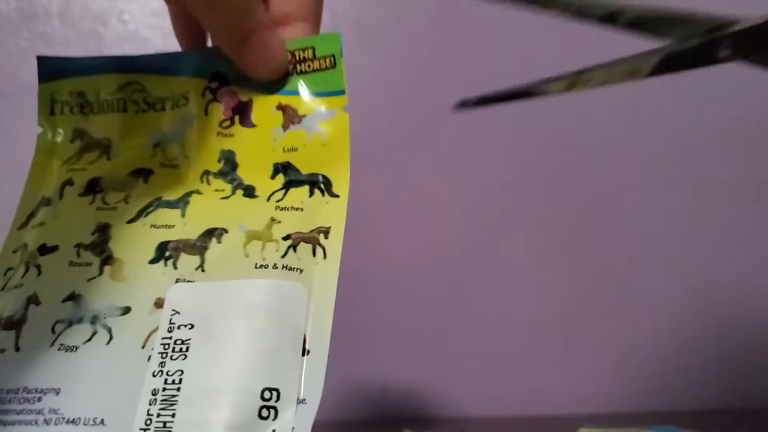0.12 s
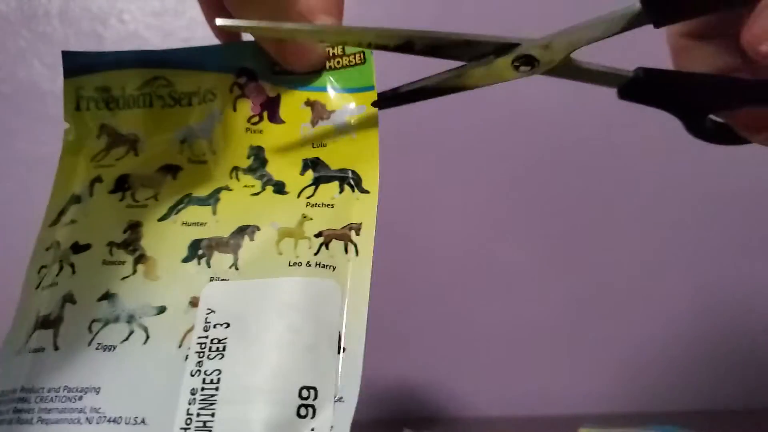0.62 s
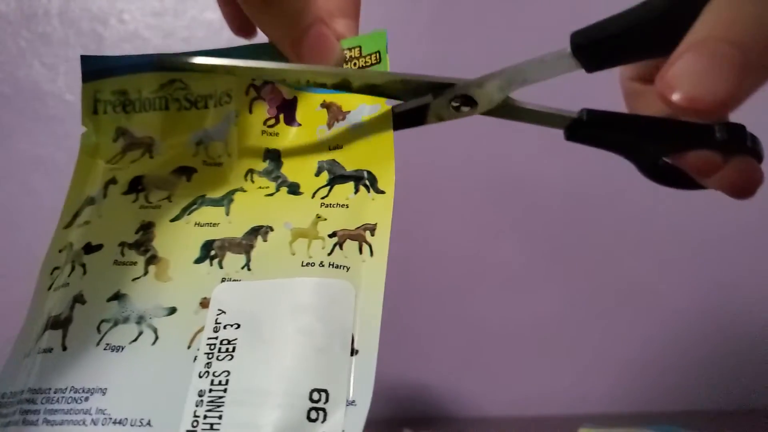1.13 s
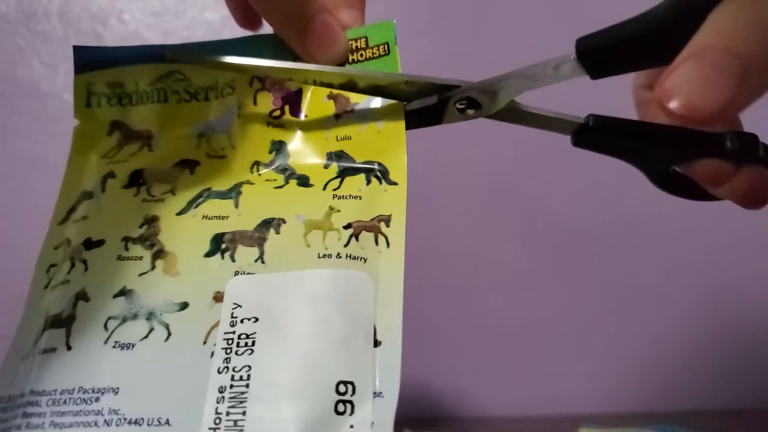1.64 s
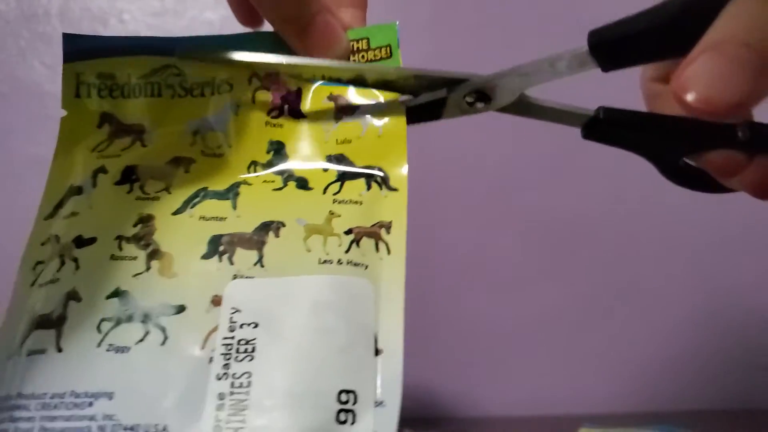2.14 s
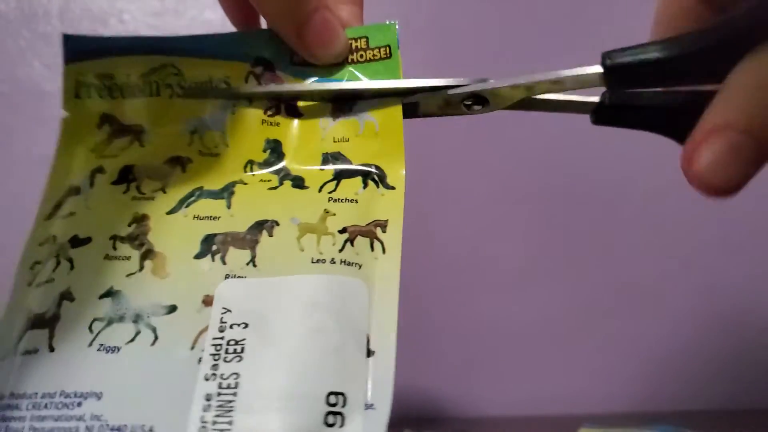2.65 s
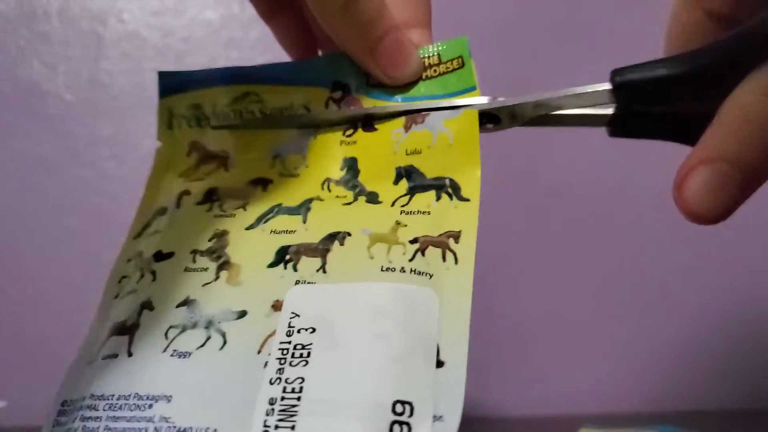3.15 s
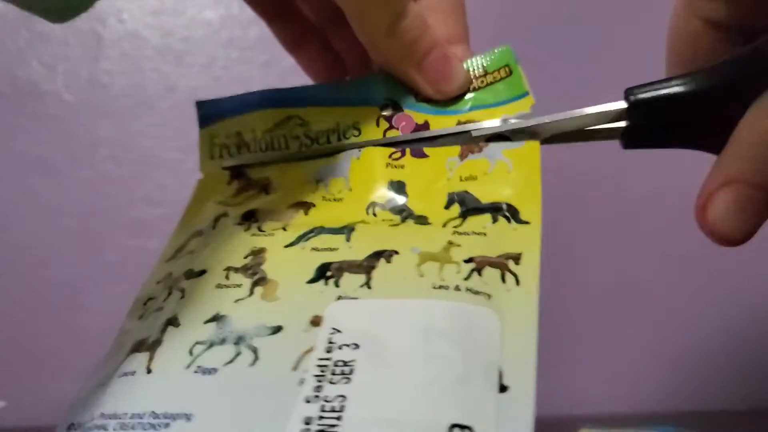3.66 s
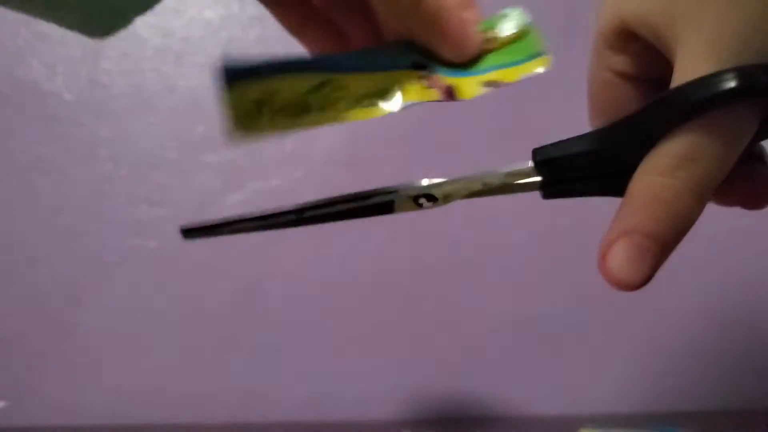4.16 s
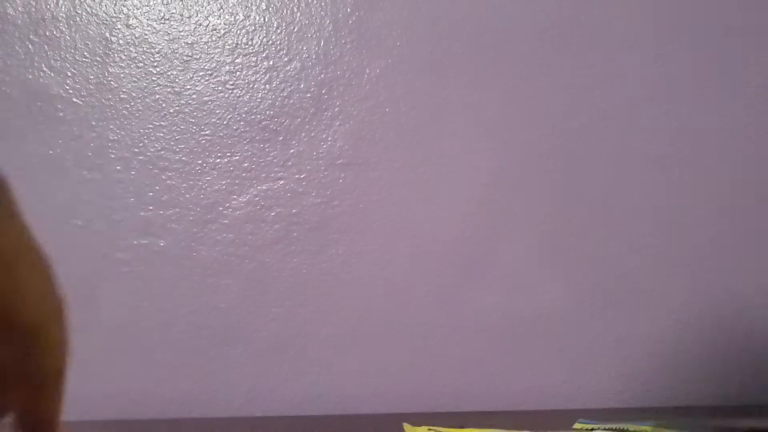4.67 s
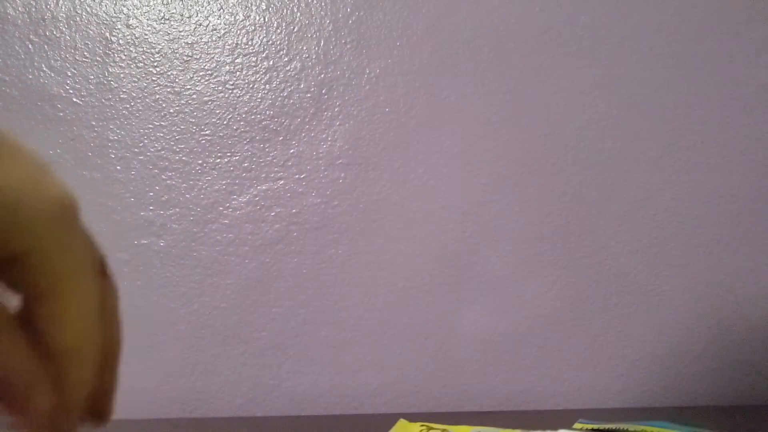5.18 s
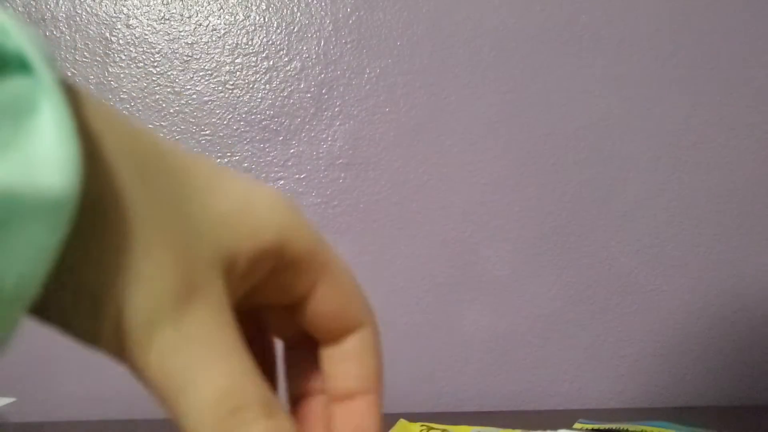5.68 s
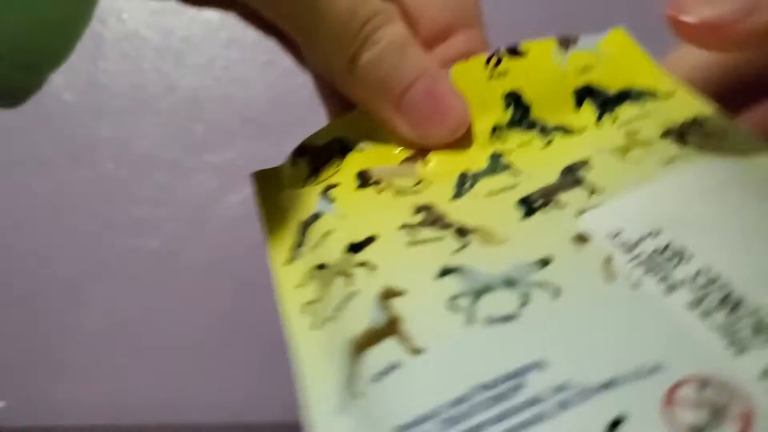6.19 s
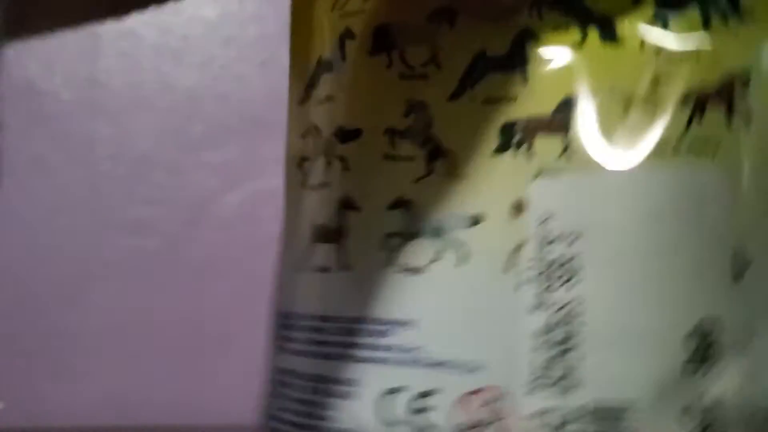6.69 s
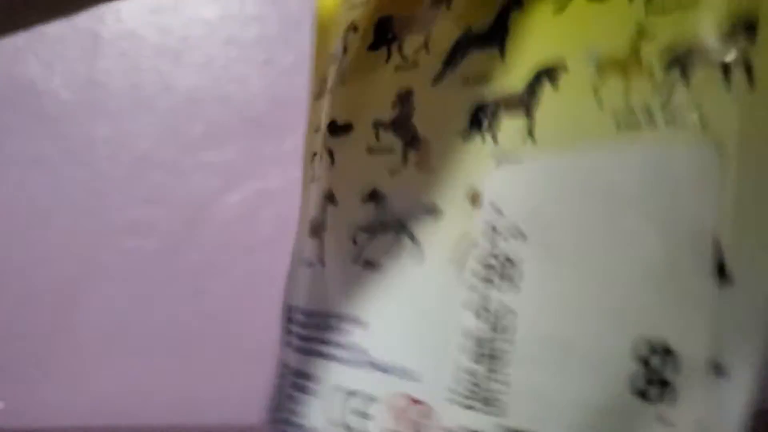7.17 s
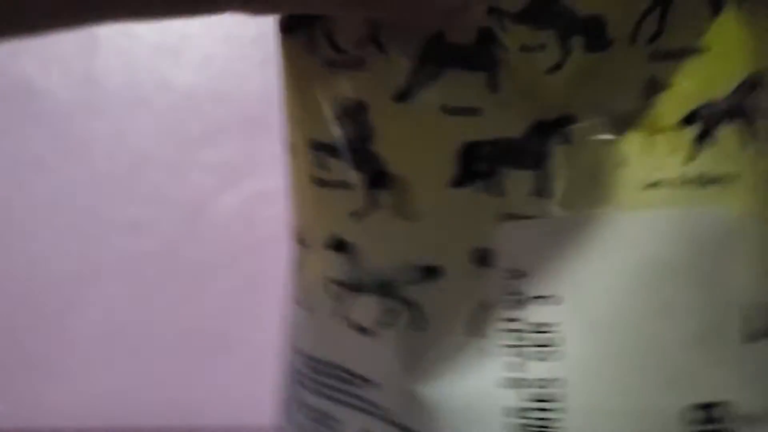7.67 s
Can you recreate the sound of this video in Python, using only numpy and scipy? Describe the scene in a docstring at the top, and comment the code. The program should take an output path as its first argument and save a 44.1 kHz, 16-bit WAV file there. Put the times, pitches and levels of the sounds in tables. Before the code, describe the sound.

Scissors slide and snip through a stiff plastic pouch, clatter down on a table, then hands crinkle and snap the pouch open.

```python
"""A stiff plastic pouch, held close to a pair of microphones over a table in a small room, rustles and ticks.
Scissor blades slide on the film, then cut off the top: strokes of clumped random slips, with creases snapping
as filtered bursts. The pouch drops on the table and the scissors clatter down after it, ringing decaying table
modes. Last, hands pull the pouch open: more rustle and snaps, and near the end a fold creaks by stick-slip.
A faint murmur and hiss of room air lies under it all."""
import sys
import numpy as np
from scipy import signal
from scipy.fft import rfft, irfft
from scipy.io import wavfile
from scipy.ndimage import uniform_filter1d, map_coordinates

SR = 44100
rng = np.random.default_rng(int(sys.argv[2]) if len(sys.argv) > 2 else 0)


def volts_from_db(level):
    """Convert decibel levels to linear amplitude ratios."""
    exponent = np.asarray(level, float) / 20
    return 10 ** exponent


def master(y):
    """Save y as 16-bit WAV."""
    cut = np.clip(np.atleast_2d(y).T, -1, 1)
    pcm = np.round(cut * 32767)  # scale
    wavfile.write(sys.argv[1], SR, pcm.astype(np.int16))


N = 344499  # samples
LEAD = 1.2  # samples by which the nearer microphone leads, per dB of left-right balance


def unit(x):
    """Scale to rms 1."""
    return x / np.sqrt(np.mean(x ** 2) + 1e-20)


def along(points, hz):
    """Read (frequency_hz, value) points along a log frequency axis."""
    f, v = np.transpose(points)
    return np.interp(np.log(hz + 1), np.log(f + 1), v)


def curves(rows):
    """One value per sample for each column after the time."""
    s, *columns = np.transpose(rows)
    return [np.interp(np.arange(N) / SR, s, column) for column in columns]


def wobble(rate):
    """A smooth random curve, rate knots a second."""
    knots = rng.standard_normal(int(N * rate / SR) + 4)
    return map_coordinates(knots, [np.arange(N) * rate / SR])


def coloured(x, spectrum):
    """Pass x through a causal, minimum-phase filter with the given spectrum."""
    m = 4096
    gain = volts_from_db(along(spectrum, np.fft.rfftfreq(m, 1 / SR)))
    cepstrum = irfft(np.log(gain + 1e-6), m)
    # folding the cepstrum onto positive time makes the filter causal
    cepstrum[1:m // 2] *= 2
    cepstrum[m // 2 + 1:] = 0
    response = irfft(np.exp(rfft(cepstrum)), m)
    return signal.fftconvolve(x, response[None], axes=1)[:, :N]


def twins(length, alike):
    """Two noises that share a part."""
    noise, alike = rng.standard_normal((3, length)), np.clip(alike, 0, 1)
    return np.sqrt(alike) * noise[0] + np.sqrt(1 - alike) * noise[1:]


def add(pair, s, sounds, pan_db):
    """Place one sound, a row per side: louder and earlier at the nearer microphone."""
    for side, sign in enumerate((1, -1)):
        start = round(s * SR - sign * LEAD * pan_db / 2)
        pair[side, start:start + sounds.shape[1]] += volts_from_db(sign * pan_db / 2) * sounds[side]


def heard(x, pan_db, alike):
    """Three noise rows reach two microphones: a shared part with a time lead, and each side's own part."""
    alike = np.clip(alike, 0, 1)
    late = np.interp(np.arange(N) - LEAD * pan_db, np.arange(N), x[0])
    shared = np.array([x[0], late])
    return volts_from_db([pan_db / 2, -pan_db / 2]) * (np.sqrt(alike) * shared + np.sqrt(1 - alike) * x[1:])


# colour of the room air: frequency_hz, relative density_db (per Hz)
AIR_COLOUR = [(25, -16), (69, -17), (229, -27), (700, -46), (2000, -53), (6700, -49), (9000, -55),
              (16000, -57)]


def air():
    """The quiet low murmur of the room comes in uneven lumps over a steady faint hiss."""
    steady_db = -69  # rms
    steady = unit(coloured(rng.standard_normal((2, N)), AIR_COLOUR))
    low = signal.sosfilt(signal.butter(2, 250, fs=SR, output="sos"), steady)
    lumps = volts_from_db(4.5 * wobble(9))
    return volts_from_db(steady_db) * (steady + (lumps - 1) * low)


# how fast the small room dies away: frequency_hz, t60_s
ROOM_DECAY = [(100, 0.44), (1000, 0.11), (12000, 0.17)]


def room(x):
    """Each frequency of the walls' answer dies at its own speed; the source moves, so the answer changes."""
    out, step = np.zeros((2, N + SR)), SR // 5  # a new answer every 0.2 s
    delay = 130  # samples before the walls answer
    for start in range(0, N, step):
        hz, t, z = signal.stft(rng.standard_normal((2, SR // 3)), SR, nperseg=256)
        decay = volts_from_db(-60 * t / along(ROOM_DECAY, hz)[:, None])
        tail = signal.istft(z * decay, SR, nperseg=256)[1]
        tail = tail / np.linalg.norm(tail[0])
        source = x[:, start:start + step].mean(0)
        wet = signal.fftconvolve(source[None], tail, axes=1)
        out[:, start + delay:start + delay + wet.shape[1]] += wet
    return out[:, :N]


def slips(per_s, spread_db, smooth):
    """Tiny random slips of uneven size over a smooth hiss."""
    hit = rng.random((3, N)) < per_s / SR
    size_db = spread_db * np.minimum(rng.exponential(size=(3, N)), 3.5)
    size = volts_from_db(size_db) * rng.standard_normal((3, N))
    return unit(hit * size) + smooth * rng.standard_normal((3, N))


def shifting(x, patchy_db):
    """The folds of the film keep changing, so its resonances come and go in patches."""
    z = signal.stft(x, nperseg=256)[2]
    field = rng.standard_normal(z.shape[1:])
    field = uniform_filter1d(field, size=2, axis=0)  # across frequency
    field = uniform_filter1d(field, size=14, axis=1)  # across time
    return signal.istft(z * volts_from_db(patchy_db * unit(field)), nperseg=256)[1][:, :N]


# faint rustle of the pouch merely held: time_s, relative level_db
HELD = [(0, -66.5), (.22, -74), (.8, -69), (1.23, -74.5), (1.32, -65.5), (1.52, -79), (1.68, -69.5),
        (2.07, -77), (2.25, -62.5), (2.8, -60), (3.4, -59), (3.64, -62), (3.97, -55), (4.24, -64.5),
        (4.36, -90), (4.8, -95), (4.97, -56.5), (5.16, -65.5), (5.85, -61.5), (6.15, -54), (6.5, -51.5),
        (6.6, -63), (7.05, -62), (7.3, -57.5), (7.62, -62.5), (7.81, -77)]
# strokes that swell or fade, blades sliding on or closing through the film: # start_s, length_s, relative
# level_db, swell_db (over the stroke), brightness_db
CUTS = [(0.629, 0.047, -50.5, 10, 0.5), (1.553, 0.091, -47, -6, -4.5), (2.478, 0.16, -55.5, -6, 1),
        (2.617, 0.14, -37.5, 5.5, 0), (2.876, 0.15, -45, 13.5, 5), (3.071, 0.082, -39, -9, 1.5),
        (3.168, 0.2, -40.5, -1, 1.5), (3.391, 0.085, -44.5, 5.5, -0.5), (3.589, 0.086, -38, -2.5, 1.5),
        (3.76, 0.16, -42.5, 5.5, 2.5), (3.984, 0.12, -38, 16.5, 5)]
# fingers, blades or table rubbing the pouch: start_s, length_s, relative level_db, brightness_db
RUBS = [(0.056, 0.11, -59.5, -2.5), (0.264, 0.1, -54.5, -9), (0.389, 0.1, -53, -6.5),
        (0.525, 0.018, -47, -1), (0.94, 0.037, -51.5, 0.5), (1.128, 0.045, -60, -9.5),
        (1.368, 0.057, -51, -5.5), (1.727, 0.09, -55.5, -5.5), (1.835, 0.087, -53, -7.5),
        (2.113, 0.12, -53.5, -0.5), (2.312, 0.035, -43, -1.5), (4.101, 0.033, -40, 16.5),
        (4.148, 0.045, -35, -1), (4.453, 0.016, -72.5, 9), (4.577, 0.015, -72, 5),
        (4.869, 0.051, -35, -2.5), (5.063, 0.035, -63, 23), (5.266, 0.049, -32, 2.5),
        (5.348, 0.051, -25.5, -10.5), (5.5, 0.025, -29.5, -13), (5.776, 0.023, -35.5, -0.5),
        (6.051, 0.012, -59.5, 19.5), (6.113, 0.011, -41.5, 10.5), (6.407, 0.0099, -33.5, -2),
        (6.468, 0.0089, -23, -3), (6.816, 0.024, -48.5, -2), (6.996, 0.035, -49.5, 4),
        (7.177, 0.037, -49.5, 2.5), (7.243, 0.044, -41, -3.5), (7.493, 0.073, -44, 3.5),
        (7.641, 0.059, -45.5, -0.5)]


def at_force(x, lumps, bright, sag_db):
    """Strokes attack, hold and release in lumps over smoother held rustle; bright = 1 follows brightness."""
    attack_s, release_t60_s = 0.005, 0.083  # the film settles when let go
    held_db, = curves(HELD)
    held_tone_db = 1.5 + 0.68 * (held_db + 53.0)  # the fainter, the duller
    power = volts_from_db(held_db + bright * held_tone_db) ** 2 / np.mean(x ** 2) * lumps ** 1.6
    # a rub is strongest at its start, so its swell is downward
    rubs = [(s, length, db, -1 - sag_db, tone_db) for s, length, db, tone_db in RUBS]
    t = np.arange(SR // 2) / SR
    for s, length, db, swell_db, tone_db in CUTS + rubs:
        start = round(s * SR)
        swell = swell_db * (np.minimum(t / length, 1) - .5)
        release = -60 * np.maximum(t - length, 0) / release_t60_s
        gain = volts_from_db(db + bright * tone_db + swell + release) * (1 - np.exp(-t / attack_s))
        # each stroke is levelled by the power of the film noise during it
        usual = np.mean((lumps * x)[:, start:start + round(length * SR)] ** 2)
        stroke = (gain ** 2 / usual)[:N - start]
        power[start:start + len(t)] += stroke * lumps[start:start + len(t)] ** 2
    return np.sqrt(power) * x


# where the hands are between the microphones: time_s, left_right_db
PLACE = [(0.0, 9), (2.02, 10), (5.48, 4), (5.79, 14.5), (6.5, 0), (6.72, 13), (7.81, 4.5)]
# colour of the bending sheet: frequency_hz, relative density_db (per Hz)
FLEX_COLOUR = [(24, -49), (80, -4), (177, -15), (337, 2), (521, -1), (944, 1.5), (1710, -9), (2040, -16.5),
               (2600, -9.5), (3380, -34.5), (5720, -120)]
# colour of the scraped surface: frequency_hz, relative density_db (per Hz)
SCRAPE_COLOUR = [(940, -38.5), (1600, -9), (2190, -10.5), (2960, -1), (3330, -1), (4730, -8.5),
                 (6660, -4.5), (8920, -16), (15000, -18), (16500, -42)]


def rustle():
    """Slips come in clumps; they bend the whole sheet (dull) and scrape its surface (bright)."""
    pan_db, = curves(PLACE)
    clumps = unit(1.8 * wobble(28) + 2.4 * wobble(110))
    # small folds popping stir sheet and surface at once
    crinkles = 0.3 * slips(160, spread_db=2, smooth=0)
    flex = coloured(crinkles + slips(600, spread_db=2.5, smooth=0.84), FLEX_COLOUR)
    scrape = coloured(crinkles + slips(1800, spread_db=-0.5, smooth=0.4), SCRAPE_COLOUR)
    flex = at_force(shifting(flex, patchy_db=5.5), volts_from_db(1.5 * clumps), bright=0, sag_db=3.5)
    scrape = at_force(shifting(scrape, patchy_db=2.8), volts_from_db(2.1 * clumps), bright=1, sag_db=5.5)
    # the top treble of the scrape gains 0.28 dB more per dB of force
    power = uniform_filter1d(np.mean(scrape ** 2, 0), size=900)
    force_db = 10 * np.log10(np.abs(power) + 1e-12)
    top = signal.sosfiltfilt(signal.butter(3, 8000, "high", fs=SR, output="sos"), scrape)
    scrape = scrape + top * (volts_from_db(0.28 * np.clip(force_db + 33.5, -30, 6)) - 1)
    # the held pouch ticks now and then
    pops = slips(35, spread_db=3.5, smooth=0)
    ticks = 1.1 * unit(coloured(pops, FLEX_COLOUR)) + .45 * unit(coloured(pops, SCRAPE_COLOUR))
    ticks = volts_from_db(curves(HELD)[0]) * ticks
    film = heard(ticks, pan_db, alike=0.81)
    film = film + heard(flex, pan_db, alike=0.41)
    return film + heard(scrape, pan_db, alike=0.1)


# knocks on the table, first the scissor tips snapping shut, then things landing: time_s, relative level_db,
# relative boom_db (modes under 350 Hz), left_right_db
KNOCKS = [(4.161, -3, -24, 9), (4.202, -9.5, -19, 2), (4.874, -9, -11, -1), (4.898, -7.5, -20, 6.5),
          (5.271, 4.5, -23, 5.5), (5.32, 2.5, -21.5, 0.5), (5.345, 0, -19, 7.5), (5.358, -11, -21, 7.5),
          (5.377, -10.5, -15, 12), (5.402, -11, -35, -1.5), (5.517, -29, 8.5, 3.5)]
# modes of the table top and what lies on it: frequency_hz, relative level_db, t60_s
TABLE_MODES = [(99, -4.5, .22), (109, -7, .18), (226, -2, .1), (256, -5, .1), (288, -2, .15), (556, -9, .1),
               (638, -12, .15), (680, -13, .15), (879, -6, .09), (1360, 0, .05), (1725, -3, .05),
               (2121, 0, .045), (2229, 2, .045), (2750, -3, .03), (4300, -8, .025)]


def knocks():
    """Every knock rings the same table modes at new strengths, with a short dull rattle."""
    out, t = np.zeros((2, N + SR)), np.arange(SR // 2) / SR
    hz, level_db, t60 = np.transpose(TABLE_MODES)[:, :, None]
    dull = signal.butter(4, (300, 4400), "band", fs=SR, output="sos")
    rise = 1 - np.exp(-t / 0.0007)  # plastic on wood: the contact builds up
    contact = volts_from_db(20 - 60 * t / 0.0066) + volts_from_db(0 - 60 * t / 0.027) + volts_from_db(-1.0 - 60 * t / 0.17)
    for s, db, boom_db, pan_db in KNOCKS:
        u = rng.standard_normal((3, len(TABLE_MODES), 1))
        strength_db = level_db + 2 * u[0] + (hz < 350) * (boom_db + 16.5)
        decay = volts_from_db(strength_db - 60 * t / t60)
        phase = u[1:] * np.minimum(hz / 400, 2.5)  # short waves reach the two sides out of step
        onset = 1 - np.exp(-hz * t / 1.0)
        modes = (decay * onset * np.sin(2 * np.pi * hz * t + phase)).sum(1)
        shake = contact * signal.sosfilt(dull, twins(len(t), alike=0.19))
        # the rattle rings the modes too, dying twice as fast
        body = (volts_from_db(strength_db - 60 * t / (0.5 * t60)) * np.sin(2 * np.pi * hz * t)).sum(0)
        body = body / np.linalg.norm(body[:SR // 50])
        rung = signal.fftconvolve(shake, body[None], axes=1)[:, :len(t)]
        rattle = 0.99 * shake + 0.53 * rung
        add(out, s, volts_from_db(db - 19.5) * rise * (modes + rattle), pan_db)
    return out[:, :N]


# resonances of the taut fold: frequency_hz, width_hz, relative level_db
FOLD = [(323, 130, -9), (1050, 82, -6.5), (4130, 500, 5), (5700, 900, -8)]


def creak():
    """A taut fold creaks as it is pulled: nearly even stick-slip, swelling and fading, rings the fold."""
    start_s, length_s, slips_per_s, level_db = 7.5235, 0.036, 215, -16.5
    out, t = np.zeros((2, N + SR)), np.arange(SR // 20) / SR
    hz, width, mode_db = np.transpose(FOLD)[:, :, None]
    for at in np.arange(0, length_s, 1 / slips_per_s):
        u = rng.standard_normal((2, len(FOLD), 1))
        decay = volts_from_db(mode_db + 2 * u[0]) * np.exp(-np.pi * width * t)
        ring = (decay * np.sin(2 * np.pi * hz * (1 + 0.055 * u[1]) * t)).sum(0)
        swell = np.sin(np.pi * (at / length_s * 0.94 + 0.18))
        slip_s = start_s + at + 0.00049 * rng.standard_normal()
        add(out, slip_s, volts_from_db(level_db) * swell * np.array([ring, ring]), 5)
    return out[:, :N]


# creases buckling close to the microphones:
# time_s, level_db (facet peak before left-right balance), facet pitch_hz, relative thump_db
SNAPS = [(0.059, -26.5, 3800, -15.5), (0.159, -52.5, 600, 4.5), (.946, -52, 3000, 4.5),
         (1.753, -33.5, 3770, -13.5), (2.005, -47, 3170, 2.5), (2.32, -34, 3660, 0.5),
         (2.584, -25.5, 1650, -14.5), (2.732, -18.5, 3100, -18), (2.847, -28, 3070, -16.5),
         (2.885, -29, 3300, -9.5), (2.967, -15, 3080, -16), (2.99, -6.5, 1380, -26),
         (3.088, -30.5, 3400, -10.5), (3.134, -20.5, 4000, -15), (3.179, -6, 2570, -25.5),
         (3.226, -25.5, 6850, -22), (3.416, -5.5, 1650, -18.5), (3.515, -19.5, 4700, -14),
         (3.597, -21.5, 3800, -28), (3.641, -14, 3900, -14), (3.677, -19, 4070, -26.5),
         (3.767, -22.5, 6500, -21), (3.856, -16, 4560, -20.5), (3.904, -32, 3540, -5),
         (3.934, -22.5, 3330, -3), (3.986, -23, 7100, -12), (4.034, -15.5, 2590, -15.5),
         (4.07, -14, 5700, -26.5), (4.161, -6.5, 1487, -24.5), (4.837, -29, 4900, -18.5),
         (4.856, -23, 1450, -15), (4.877, -21.5, 3600, -23.5), (4.897, -19.5, 4280, -27.5),
         (4.953, -24.5, 3260, -18.5), (5.238, -18, 7600, -21.5), (5.18, -45, 3530, -7),
         (5.277, -9.5, 8460, -32), (5.368, -17.5, 6000, -20), (5.668, -18.5, 5480, -17.5),
         (5.786, -15.5, 5500, -14.5), (5.941, -36.5, 2600, -20.5), (5.975, -24.5, 4740, -23),
         (6.118, -18, 7300, -10.5), (6.19, -15, 2400, -27.5), (6.311, -27.5, 2640, -25.5),
         (6.345, -16.5, 3200, -20), (6.402, -14.5, 5400, -27.5), (6.453, -25.5, 6600, -22),
         (6.481, -13.5, 2480, -16), (6.536, -20, 2940, -6), (6.69, -41, 4170, -27),
         (6.705, -9.5, 5590, -25), (6.906, -38.5, 5700, -18), (6.939, -41, 1920, 3.5),
         (7.064, -7, 5300, -25), (7.08, -18.5, 4900, -9), (7.164, -41.5, 1100, -3), (7.181, -14, 5950, -14),
         (7.235, -11, 2730, -20), (7.267, -21.5, 2930, -10.5), (7.292, -29.5, 4080, -7),
         (7.331, -22, 5700, -21), (7.347, -18.5, 4330, -19), (7.375, -29.5, 3800, -6.5),
         (7.412, -8.5, 4160, -18), (7.451, -4.5, 4870, -23.5), (7.46, -7.5, 2580, -12),
         (7.507, -9.5, 6530, -17.5), (7.515, -17, 1990, -14), (7.579, -27, 1620, -2),
         (7.657, -12.5, 2460, -11.5), (7.722, -32.5, 4240, 0.5), (7.732, -12.5, 5900, -20.5)]


def snaps():
    """A buckling crease: dry crack, a cycle or two of the freed facet, sheet thump, after-crackle."""
    out, t = np.zeros((2, N + SR)), np.arange(SR // 10) / SR
    high = signal.butter(2, 5600, "high", fs=SR, output="sos")
    sheet = signal.butter(2, (210, 1400), "band", fs=SR, output="sos")
    rise = 1 - np.exp(-t / 0.000051)
    burst = volts_from_db(-60 * t / 0.0035) + volts_from_db(-12.5 - 60 * t / 0.025)  # snap, then after-crackle
    # the pouch shoves a puff of air, the room booms after it, the whole pouch sways
    puff = np.exp(-t / 0.0036) * np.sin(2 * np.pi * 175 * t) * (1 - t / 0.0069)
    boom = volts_from_db(-60 * t / 0.36) * np.sin(2 * np.pi * 101 * t) * (1 - np.exp(-t / 0.012))
    sway = np.exp(-t / 0.0068) * np.sin(2 * np.pi * 70 * t)
    push = puff + 0.098 * boom + 0.17 * sway
    for s, db, hz, thump_db in SNAPS:
        # the crack is weaker on thumpy snaps, stronger at the blades and on small, high facets
        at_blades = any(start - .01 < s < start + length for start, length, *_ in CUTS)
        crack_db = -5 - 1.4 * (thump_db + 24) + 6 * at_blades + 4 * np.log2(hz / 4000)
        facet = signal.butter(2, (hz * 0.71, hz * 1.337), "band", fs=SR, output="sos")
        ring = signal.sosfilt(facet, rise * burst * twins(len(t), alike=0.89))
        # the facet's own note and four chance neighbours
        u = rng.random((3, 5, 1))
        notes = hz * np.where(np.arange(5)[:, None], 4.52 ** (u[0] - .75), 1)
        tones = (volts_from_db(-9 * u[1] - 60 * t / .014) * np.sin(2 * np.pi * notes * t)).sum(0)
        ring = ring / np.abs(ring).max() + 0.14 * tones
        thump = signal.sosfilt(sheet, rise * volts_from_db(-60 * t / 0.029) * twins(len(t), alike=0.46))
        crack = signal.sosfilt(high, rise * burst * twins(len(t), alike=0.16))
        parts = zip((ring, thump, crack, push), (0, thump_db + 7.5, crack_db, thump_db - 6.0))
        sound = sum(volts_from_db(level) * part / np.abs(part).max() for part, level in parts)
        add(out, s, volts_from_db(db) * sound, np.interp(s, *np.transpose(PLACE)))
    return out[:, :N]


def scene():
    """Film and table close by, their answer from the small room, and the air."""
    hits = snaps() + knocks() + creak()
    film = rustle()
    walls = room(volts_from_db(-10.5) * hits + volts_from_db(-25.5) * film)
    return hits + film + walls + air()


def top_cut(x):
    """Nothing passes above about 16.9 kHz."""
    return signal.sosfilt(signal.butter(12, 16850, fs=SR, output="sos"), x)


def record(dry):
    """The small microphones lose the deepest bass and the top treble; the input tops out at full scale."""
    thin = signal.sosfilt(signal.butter(2, 52, "high", fs=SR, output="sos"), dry)
    thin = signal.sosfilt(signal.butter(8, 16100, fs=SR, output="sos"), thin)
    return top_cut(np.clip(thin, -1, 1))


dry = scene()
out = record(dry)
master(out)
```